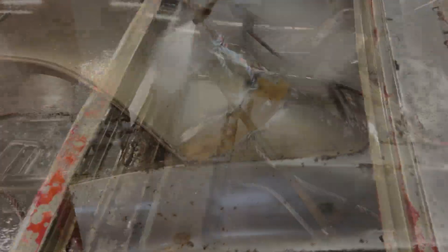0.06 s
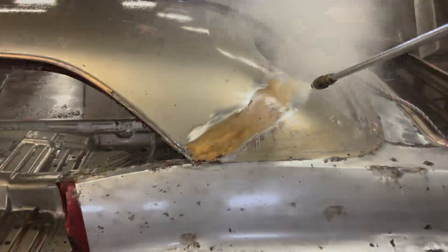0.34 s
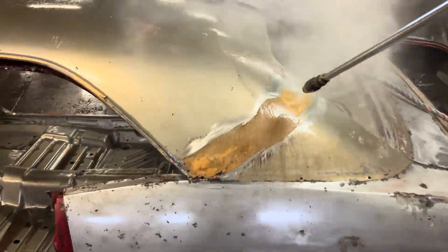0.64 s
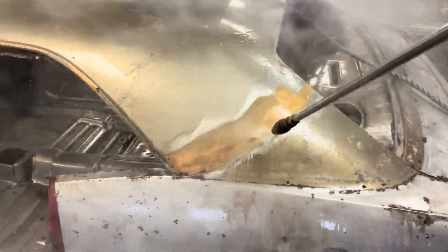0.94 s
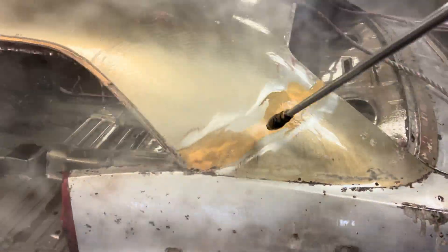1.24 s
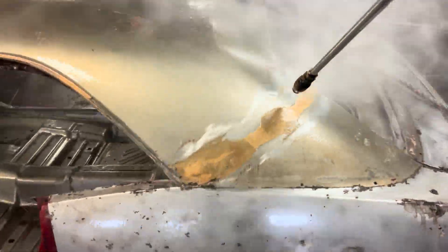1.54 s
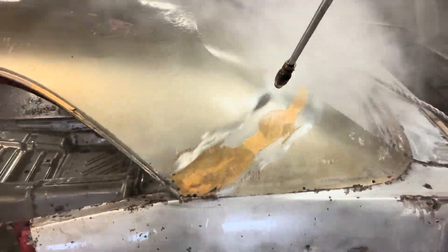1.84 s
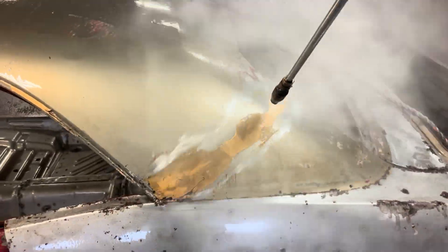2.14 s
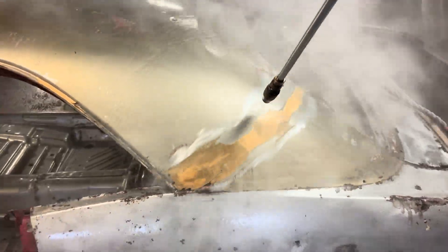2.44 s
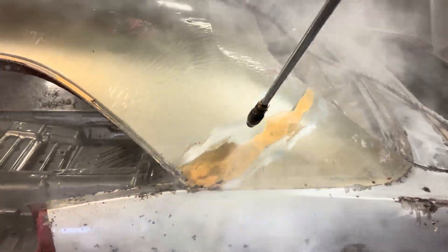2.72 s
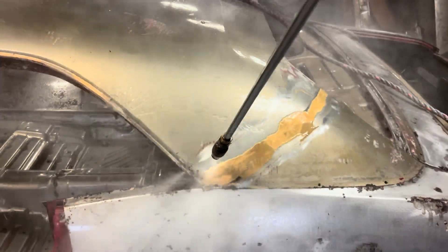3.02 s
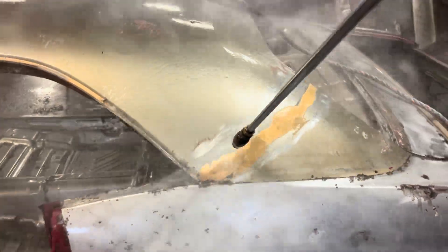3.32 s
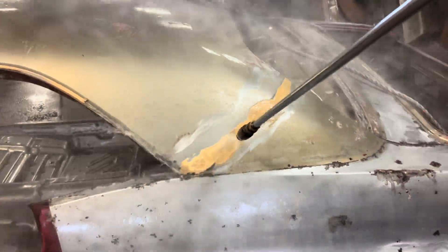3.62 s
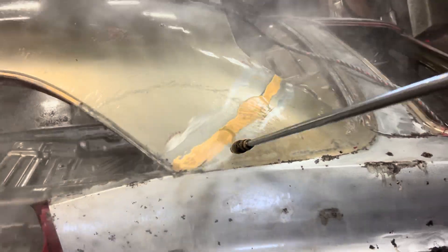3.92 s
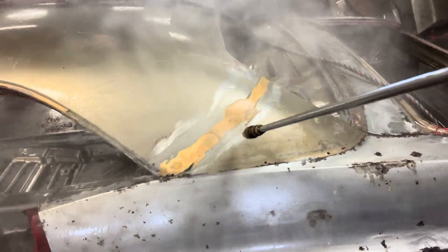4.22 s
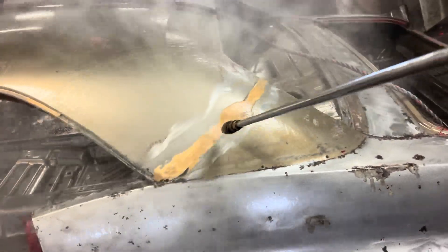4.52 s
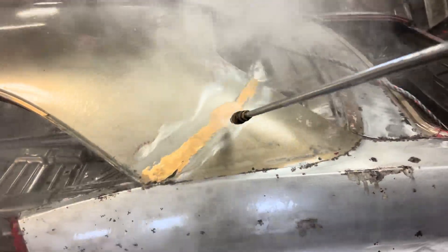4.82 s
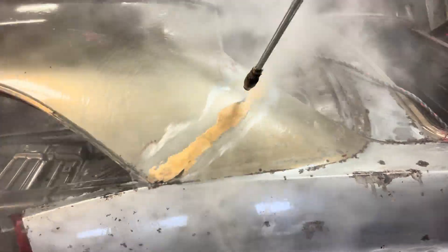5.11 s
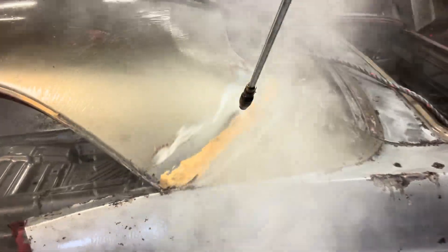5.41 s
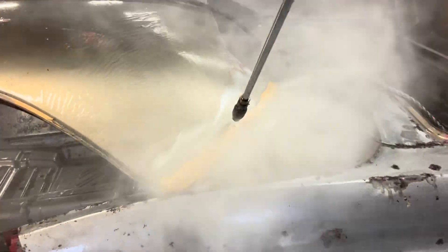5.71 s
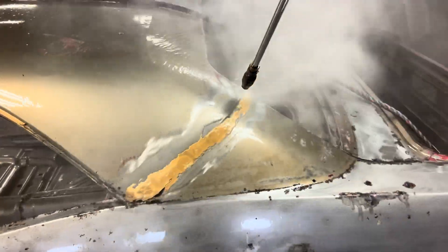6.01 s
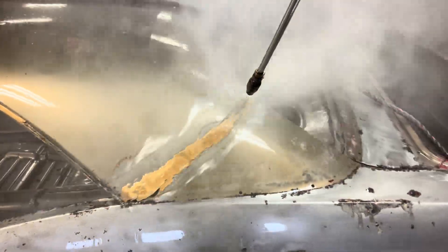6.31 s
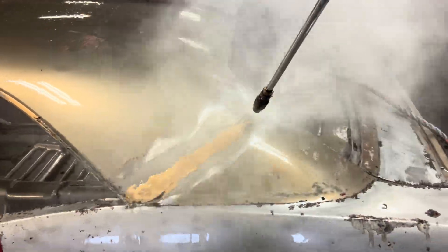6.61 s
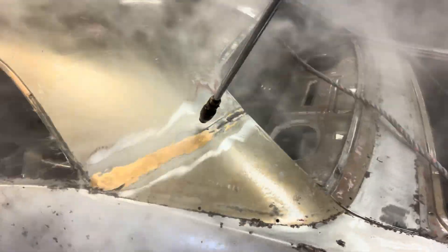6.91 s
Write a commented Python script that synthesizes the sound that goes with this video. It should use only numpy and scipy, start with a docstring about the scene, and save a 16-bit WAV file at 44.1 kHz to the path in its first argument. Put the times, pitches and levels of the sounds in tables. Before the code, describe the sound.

Close up in a workshop, a spinning water jet strips a steel car body. After a brief hollow, ringing roar, it settles into a low pitched buzz that swells and dips, wrapped in bright hissing spray above a faint pump hum. Ridges in the metal give brief honks. After five seconds the nozzle falters in pitch, one drop ticks nearby and the honks grow louder. The handheld microphone is softly bumped a few times.

```python
"""A pressure washer with a spinning turbo nozzle strips paint from bare steel car panels in a workshop.
The sound opens on the jet roaring and ringing in a hollow frame, then cuts within half a second to the
jet on a panel. Circling about 280 times a second, it makes the sheet drone and buzz at that rate; spray
hisses, and motor and pump hum further back. Ridges honk, edges catch the jet, the microphone is softly
bumped. After five seconds the rotor stumbles, one fat drop ticks close by and the honks thicken."""
import sys
import numpy as np
from scipy import signal
from scipy.fft import rfft, irfft, next_fast_len
from scipy.io import wavfile
from scipy.ndimage import uniform_filter1d, map_coordinates

SR = 44100
rng = np.random.default_rng(int(sys.argv[2]) if len(sys.argv) > 2 else 0)


def bounce(signal):
    """Save signal as a 16-bit WAV file at the path given by the first command-line argument."""
    frames = np.transpose(np.atleast_2d(signal))
    limited = np.clip(frames, -1, 1)
    pcm = np.round(limited * 32767).astype(np.int16)
    wavfile.write(sys.argv[1], SR, pcm)


N = 315315

# The rotor sags when spray is thrown back at it. Each row: time in seconds, rotation rate in Hz.
ROTOR_SPEED = [(0, 282.5), (1.3, 280.4), (1.85, 286.2), (2.35, 275.8), (2.7, 286.6), (4.0, 285.1),
               (4.82, 280), (4.94, 289.3), (5.302, 288.5), (5.461, 268), (5.58, 294), (5.78, 264.7),
               (5.95, 283.9), (6.1, 282.7), (6.161, 270.4), (6.32, 266.2), (6.419, 284.2), (6.66, 272),
               (6.861, 265), (6.96, 287.6)]
# The opening, in the hollow frame. Each row: time in seconds, ring level in dB, roar level in dB.
FRAME_LEVELS = [(0, -56, -24.5), (0.12, -29, -23), (0.18, -17, -30), (0.26, -26, -32), (0.3, -30, -40),
                (0.34, -26, -37), (0.44, -65, -27.5), (0.46, -60, -72)]
# The sheet's drone between nodal lines. Each row: start in seconds, length in seconds, level in dB.
DRONE_SWELLS = [(-0.06, 0.21, -22.5), (0.05, 0.11, -18), (0.186, 0.12, -23), (0.308, 0.19, -29),
                (0.584, .12, -33), (0.765, 0.23, -28.5), (1.058, 0.22, -31), (1.306, .36, -27),
                (1.677, 0.24, -26), (1.923, 0.18, -33), (2.128, 0.19, -25.5), (2.3, 0.14, -27),
                (2.436, 0.25, -24), (2.733, 0.93, -30.5), (3.745, 0.23, -31), (4.13, .12, -37),
                (4.214, 0.22, -28.5), (4.477, 0.29, -31.5), (4.612, 0.24, -24.5), (4.852, 0.38, -26),
                (5.146, 0.12, -23), (5.354, 0.15, -32), (5.49, .25, -25), (5.845, 0.2, -29.5),
                (6.09, 0.075, -31), (6.27, 0.2, -25), (6.56, .34, -33), (6.912, 0.21, -29)]
# Water breaking up on steel. Each row: time in seconds, then rasp, hiss and mist levels in dB.
SPRAY_LEVELS = [(0, -28.5, -28, -28.5), (0.24, -23, -27, -25), (0.41, -29, -27.5, -29),
                (0.46, -36, -37, -35), (1.0, -43, -36, -35), (1.55, -39.5, -36, -35.5),
                (2.0, -35.5, -35.5, -34), (2.8, -39, -34.5, -33), (3.03, -31.5, -32.5, -31.5),
                (3.35, -37.5, -32.5, -32.5), (3.8, -39.5, -31.5, -33.5), (4.3, -40, -34, -34),
                (5.24, -37.5, -35, -35), (5.36, -35.5, -32, -32), (5.53, -34, -30, -30.5),
                (5.85, -34, -33, -33.5), (6.2, -34.5, -35, -34), (6.5, -34, -34, -34),
                (6.88, -32, -34.5, -34), (6.96, -36.5, -36.5, -33.5), (7.15, -31.5, -35.5, -35)]
# Tones of motor and pump. Each row: frequency in Hz, level in dB.
PUMP_TONES = [(198, -59), (395.7, -38.7), (1187, -53), (1319.3, -47), (1583.2, -51.5), (1781.5, -58),
              (3977, -59), (6665, -58.5)]
# Soft bumps on the hand-held microphone. Each row: start in seconds, gain in dB.
HANDLING_BUMPS = [(0.166, -26), (0.205, -41), (0.26, -36), (2.856, -23.5), (5.782, -30)]
# The jet on a ridge. Each row: start in seconds, length in seconds, buzz in dB, second harmonic in dB.
RIDGE_HONKS = [(0.215, 0.049, -23, -30), (0.394, 0.055, -55, -30), (0.473, 0.35, -38, -38.5),
               (1.093, 0.15, -39.5, -34.5), (1.16, 0.016, -38, -34), (1.299, 0.027, -37, -30),
               (1.451, 0.03, -34, -38), (1.634, .06, -31.5, -37), (1.875, 0.043, -38, -36),
               (1.959, 0.17, -32.5, -35.5), (2.164, 0.042, -31, -34), (2.523, 0.027, -37, -38),
               (2.765, 0.071, -54, -28), (2.95, 0.34, -33.5, -38), (3.298, 0.11, -36.5, -37),
               (3.44, .13, -33.5, -47), (3.77, 0.126, -32, -35.5), (4.454, .06, -36, -33),
               (4.667, 0.064, -24, -29.5), (4.957, .2, -30, -37), (5.276, .08, -43, -34),
               (5.39, 0.1, -30.5, -38), (5.54, .18, -38, -55), (5.824, .06, -27.5, -45),
               (5.895, 0.074, -23, -33), (6.03, 0.067, -28.5, -36), (6.116, 0.044, -21, -27),
               (6.198, 0.053, -26, -31), (6.275, .18, -20.5, -27), (6.567, .21, -27, -29.5),
               (6.83, 0.051, -30, -31), (7.029, 0.16, -30.5, -38)]
# The jet catching an edge. Each row: centre in seconds, half length in seconds, level in dB.
EDGE_CATCHES = [(0.743, 0.032, -41), (2.194, 0.018, -55), (3.482, 0.032, -27), (5.455, 0.041, -34.5),
                (6.403, 0.056, -26.5), (6.851, .015, -35)]

# Spectral envelopes of the sources. Each row: frequency in Hz, relative level in dB.
RING_SPECTRUM = [(600, -25), (850, -10), (1130, 0), (1410, -12), (1700, -12), (2300, -24)]  # resonance of the frame
ROAR_SPECTRUM = [(40, -28), (130, -14), (250, 5.5), (420, 8), (800, 8.5), (1500, 4), (3000, -2), (4500, 3),
                 (6000, -29), (9000, 0), (12000, -22), (16000, -25)]  # spray trapped in the frame
SLAP_SPECTRUM = [(560, -35), (830, 0), (1120, -3.5), (1400, -7), (1700, -15), (2000, -20), (2800, -25),
                 (4000, -34)]  # overtones of the struck sheet
SPLASH_SPECTRUM = [(100, -60), (300, -3.5), (450, -7), (600, -2), (850, 15), (1150, -2.5), (1450, 6),
                   (1900, -8), (3000, -18), (6000, -50)]  # noise of the slaps
RASP_SPECTRUM = [(900, -40), (1600, -4.5), (2200, -6), (3100, -1.5), (3800, -3.5), (4400, -7),
                 (6000, -12.5), (10000, -38)]  # coarse drops
EDGE_SPECTRUM = [(1100, -30), (1400, 0), (1700, 2), (2000, 1), (2300, 0), (2800, -2), (3500, -6),
                 (4300, -10)]  # overtones of a struck edge
HISS_SPECTRUM = [(2500, -30), (4200, -4.5), (5200, 1), (6200, 1.5), (7200, -1), (8400, 1.5), (9700, -4.5),
                 (13000, -31)]  # fine spray
MIST_SPECTRUM = [(6000, -42), (8500, -4.5), (9800, 2), (11000, 3.5), (13000, 3.5), (14500, 4), (15700, -2),
                 (17000, -40)]  # finest spray
SHOP_SPECTRUM = [(25, -34), (70, -52), (120, -16.5), (175, -12.5), (230, 0), (320, 2), (450, 0), (700, 0.5),
                 (1000, 1.5), (1400, -4), (1900, -12.5), (4000, -11), (12000, -50)]  # background of the workshop

# Absorption at the walls. Each row: frequency in Hz, time to decay by 60 dB in seconds.
REVERB_TIMES = [(200, 0.72), (2000, 0.48), (10000, 0.052)]
# Likeness of the noise at left and right. Each row: frequency in Hz, correlation coefficient.
COHERENCE = [(60, .92), (200, .97), (640, .97), (1410, .86), (2300, .6), (4000, .45), (6500, .47),
             (9500, .58), (15000, .43)]
# Stereo balance. Each row: frequency in Hz, level of left over right in dB.
LEVEL_DIFFERENCE = [(60, -1), (200, 1.5), (380, 2), (700, 0.5), (1290, 1.5), (2380, -2.5), (4400, -2),
                    (6000, 0.7), (9500, -1.5), (15000, -2)]
# Phase between the two microphone ports. Each row: frequency in Hz, lead of the left in radians.
PHASE_DIFFERENCE = [(1200, 0), (2000, -1.14), (2700, 1.38), (3900, -1.5), (4750, -1), (5500, 1),
                    (7200, -1.5), (9100, -2), (9900, -2.5), (10900, -1.4), (12700, -1.4), (14000, -3),
                    (15300, -12.5)]

SWELL_ARCH, PANEL_RISE_S = 0.25, 0.022  # an exponent of 1 gives a sine arch, less a flatter top
STRAY_DB = -42  # uneven rocking that remains even on a nodal line
FLAT_BUZZ_DB, FLAT_OCTAVE_DB = -1.5, -2.5  # slaps on flat sheet, relative to the spray's rasp
HONK_ATTACK_S, HONK_RELEASE_S = 0.013, 0.016
HONK_RASP_DB = -13.5  # drops thrown off a ridge, relative to its buzz
CATCH_HISS_DB, CATCH_MIST_DB = -2, -6  # spray fanning off an edge, relative to the catch
CATCH_PITCHED = .7  # share of a catch's power that is pitched
DROP_S, DROP_DB, DROP_DECAY_S = 5.765, -19, .0015
TOP_HZ = 15750


def amp(db):
    """Amplitude grows tenfold for every 20 dB."""
    return 10 ** (np.asarray(db) / 20)


def unit(x):
    """Normalisation to an rms of 1."""
    return x / np.sqrt(np.mean(np.abs(x) ** 2) + 1e-20)


def along(points, hz):
    """Interpolation of (Hz, value) points on a logarithmic frequency axis."""
    knot_hz, values = np.transpose(points)
    return np.interp(np.log(hz + 1), np.log(knot_hz + 1), values)


def curves(rows):
    """Linear interpolation in time: one value per sample for each column after the first."""
    times, *columns = np.transpose(rows)
    return [np.interp(np.arange(N) / SR, times, column) for column in columns]


def wobble(rate):
    """Smooth random modulation: a spline through `rate` knots a second."""
    knots = rng.standard_normal(4096)
    grid = np.arange(0, N + 32, 32)
    return np.interp(np.arange(N), grid, map_coordinates(knots, [grid * rate / SR], mode="wrap"))


def filtered(x, response):
    """Linear filtering: the spectrum of x is multiplied by a frequency response."""
    size = next_fast_len(N + SR // 4)
    return irfft(rfft(x, size) * response(np.fft.rfftfreq(size, 1 / SR)), size)[..., :N]


def blend(first, second, share):
    """Incoherent sounds add in power; `share` is the part given to the second."""
    return np.sqrt(1 - share) * first + np.sqrt(share) * second


def rush(spectrum, patchy_db, gate=1):
    """Partly coherent stereo noise of rms 1, modulated by gate, with drifting patches of colour."""
    def mid_and_side(hz):
        turn = np.arccos(np.clip(along(COHERENCE, hz), -1, 1)) / 2
        return amp(along(spectrum, hz)) * np.array([np.cos(turn), np.sin(turn)])

    white = signal.stft(rng.standard_normal((2, N)), nperseg=512)[2]
    patches = uniform_filter1d(rng.standard_normal(white.shape[1:]), size=5, axis=0)
    patches = np.clip(unit(uniform_filter1d(patches, size=50, axis=1)), -2, 2)
    pair = signal.istft(white * amp(patchy_db * patches), nperseg=512)[1][:, :N] * gate
    mid, side = filtered(pair, mid_and_side)
    return unit(np.array([mid + side, mid - side]))


def drifting(x, delay_s, drift_s, rate):
    """Propagation delay over a path whose length drifts as the lance moves."""
    n = np.arange(N)
    return np.array([np.interp(n - SR * (delay_s + drift_s * wobble(rate)), n, side) for side in x])


def rotor_angle(jitter, stumble):
    """Phase is the integral of frequency; the water-driven rotor runs less evenly as it slows."""
    hz, = curves(ROTOR_SPEED)
    sag = np.clip(1 - hz / np.percentile(hz, 75), 0, 1)
    return 2 * np.pi * np.cumsum(hz * (1 + (jitter + stumble * sag) * wobble(90))) / SR


def once_a_turn(angle, depth_db):
    """Amplitude modulation that peaks each time the jet comes round."""
    return unit(amp(depth_db * np.cos(angle)))


def overtones(angle, spectrum, scatter, rate, below):
    """Periodic slaps make harmonics, which vary as the jet wanders over the panel's modes."""
    mean_hz = np.mean(np.array(ROTOR_SPEED)[:, 1])
    out = np.zeros(N)
    for k in range(2, below):
        gain = amp(along(spectrum, k * mean_hz)) * np.exp(scatter * wobble(rate) / 2)
        # Bending waves in steel disperse, so each slap spreads into a short chirp.
        dispersion = k * k * np.pi / 7 + .9 * wobble(11)
        out += gain * np.cos(k * angle + dispersion + scatter * wobble(rate))
    return unit(out)


def hollow_frame(angle):
    """Resonance: the hollow section rings near the jet's fourth harmonic and roars with trapped spray."""
    ring_db, roar_db = curves(FRAME_LEVELS)
    ring = overtones(angle, RING_SPECTRUM, scatter=.6, rate=60, below=9)
    return amp(ring_db) * ring + amp(roar_db) * rush(ROAR_SPECTRUM, patchy_db=1.5)


def panel_drone(angle):
    """Forced vibration: the circling jet rocks the sheet at the rotor's rate, most between nodal lines."""
    t = np.arange(N) / SR
    gain = np.zeros(N)
    for start, length, db in DRONE_SWELLS:
        arch = np.sin(np.pi * np.clip((t - start) / length, 0, 1))
        gain = np.maximum(gain, amp(db) * np.abs(arch) ** SWELL_ARCH)
    gain = uniform_filter1d(gain, size=int(PANEL_RISE_S * SR) + 1)
    rocking = amp(1.3 * wobble(32)) * unit(np.cos(angle + 0.11 * wobble(70)))
    stray = unit(wobble(55) * np.cos(angle) + wobble(55) * np.sin(angle))
    return gain * rocking + amp(STRAY_DB) * stray


def panel_buzz(angle, honk, octave_honk):
    """Impact excitation, one slap a turn: firm hits honk, glancing ones hold a larger share of splash."""
    rasp_db = curves(SPRAY_LEVELS)[0]
    level = np.hypot(honk, amp(rasp_db + FLAT_BUZZ_DB + 1.2 * wobble(18)))
    octave_level = np.hypot(octave_honk, amp(rasp_db + FLAT_OCTAVE_DB + 2.4 * wobble(20)))
    strike = angle + .095 * wobble(110)
    octave = overtones(strike, [(560, 0)], scatter=.62, rate=65, below=3)
    bright = overtones(strike, SLAP_SPECTRUM, scatter=.52, rate=55, below=11)
    splash = rush(SPLASH_SPECTRUM, patchy_db=2.5, gate=once_a_turn(strike, depth_db=4.5))
    splash_share = np.interp(level, amp([-38, -30]), [.4, .2])
    flutter = amp(1.7 * wobble(55) + .6 * wobble(150))
    return flutter * (octave_level * octave + level * blend(bright, splash, splash_share))


def spray(angle, honk, caught):
    """Atomisation: coarse drops rasp in step with the rotor; finer spray and mist hiss more evenly."""
    rasp_db, hiss_db, mist_db = curves(SPRAY_LEVELS)
    coarse = np.hypot(amp(rasp_db + 1.4 * wobble(16)), amp(HONK_RASP_DB) * honk)
    pitched_share = np.interp(coarse, amp([-40, -33]), [.07, .22])
    drops = rush(RASP_SPECTRUM, patchy_db=1.1, gate=once_a_turn(angle, depth_db=2.5))
    slaps = overtones(angle, EDGE_SPECTRUM, scatter=.7, rate=35, below=15)
    rasp = coarse * amp(1.03 * wobble(30)) * blend(drops, slaps, pitched_share)
    edge = caught * blend(drops, slaps, CATCH_PITCHED)
    hiss = rush(HISS_SPECTRUM, patchy_db=1.5, gate=once_a_turn(angle, depth_db=1.3))
    hiss *= np.hypot(amp(hiss_db), amp(CATCH_HISS_DB) * caught)
    mist = rush(MIST_SPECTRUM, patchy_db=1.2, gate=once_a_turn(angle, depth_db=1.4))
    mist *= np.hypot(amp(mist_db), amp(CATCH_MIST_DB) * caught)
    billow = amp(0.45 * wobble(28) + 0.4 * wobble(7))
    return rasp + edge + billow * panel_reflection(hiss + mist, echo=0.17)


def panel_reflection(x, echo):
    """Comb filtering: the hiss interferes with its slightly later reflection from the panel."""
    return (x + echo * drifting(x, delay_s=.0013, drift_s=.00003, rate=1.51)) / np.hypot(1, echo)


def motor_and_pump():
    """Steady rotation gives a line spectrum, heard over the broad noise of the workshop."""
    clock = np.arange(N) / SR + .00006 * wobble(3.5)
    tones = sum(amp(db + wobble(4.4)) * unit(np.sin(2 * np.pi * hz * clock)) for hz, db in PUMP_TONES)
    return tones + amp(-35) * rush(SHOP_SPECTRUM, patchy_db=3.0)


def workshop_reverb(x):
    """Reverberation: reflections from the walls decay exponentially, the treble fastest."""
    hz, t, noise = signal.stft(rng.standard_normal((2, SR // 2)), SR, nperseg=256)
    decay = amp(-60 * t / along(REVERB_TIMES, hz)[:, None])
    mid, side = signal.istft(noise * decay, SR, nperseg=256)[1]
    tail = np.array([mid + .3 * side, mid - .3 * side]) / np.linalg.norm(mid)
    return signal.fftconvolve(x, tail, axes=1)[:, :N]


def handling_bumps():
    """Structure-borne sound: each bump is a short, low push with a weaker rebound."""
    t = np.arange(N) / SR
    out = np.zeros(N)
    for start, db in HANDLING_BUMPS:
        age = np.maximum(t - start, 0) / 0.0011  # in time constants
        out += amp(db) * 2 * age * (1 - age / 2) * np.exp(-age)
    return out


def ridge_honks():
    """Envelopes of the buzz and its second harmonic: on each ridge they rise, hold and fall."""
    t = np.arange(N) / SR
    buzz_gain, octave_gain = np.zeros(N), np.zeros(N)
    for start, length, buzz_db, octave_db in RIDGE_HONKS:
        end = start + length
        shape = np.interp(t, [start - HONK_ATTACK_S, start, end, end + HONK_RELEASE_S], [0, 1, 1, 0])
        buzz_gain += amp(buzz_db) * shape
        octave_gain += amp(octave_db) * shape
    return buzz_gain, octave_gain


def edge_catches():
    """Gaussian envelopes: the spray surges each time the jet crosses an edge."""
    t = np.arange(N) / SR
    return sum(amp(db) * np.exp(-((t - centre) / width) ** 2) for centre, width, db in EDGE_CATCHES)


def fat_drop():
    """A brief impact has a broad spectrum: one drop smacks down close by as a sharp tick."""
    age = np.arange(N) / SR - DROP_S
    envelope = amp(DROP_DB) * (age >= 0) * np.exp(-np.abs(age) / DROP_DECAY_S)
    return envelope * rush(RASP_SPECTRUM, patchy_db=-3)


def stereo_response(hz):
    """Direction cues: differences of level and phase are split equally between left and right."""
    half = np.array([[.5], [-.5]])
    return amp(half * along(LEVEL_DIFFERENCE, hz)) * np.exp(1j * half * along(PHASE_DIFFERENCE, hz))


def scene():
    """Superposition of panel, spray and machine, heard from just behind the lance."""
    angle = rotor_angle(jitter=.008, stumble=.25)
    impact = angle + .12 * wobble(32)  # the point of impact wanders, smearing the upper harmonics
    honk, octave_honk = ridge_honks()
    steel = panel_buzz(impact, honk, octave_honk) + hollow_frame(impact)
    toward_walls = drifting([steel.mean(axis=0)], delay_s=.004, drift_s=.0005, rate=3)
    reverb = amp(-14) * workshop_reverb(toward_walls)
    mix = steel + reverb + panel_drone(angle) + spray(impact, honk, edge_catches())
    mix = mix + motor_and_pump() + handling_bumps() + fat_drop()
    return filtered(mix, stereo_response)


def record(dry):
    """Band limiting: an ideal low-pass filter keeps nothing above TOP_HZ."""
    return filtered(dry, lambda hz: hz < TOP_HZ)


dry = scene()
out = record(dry)
bounce(out)
```